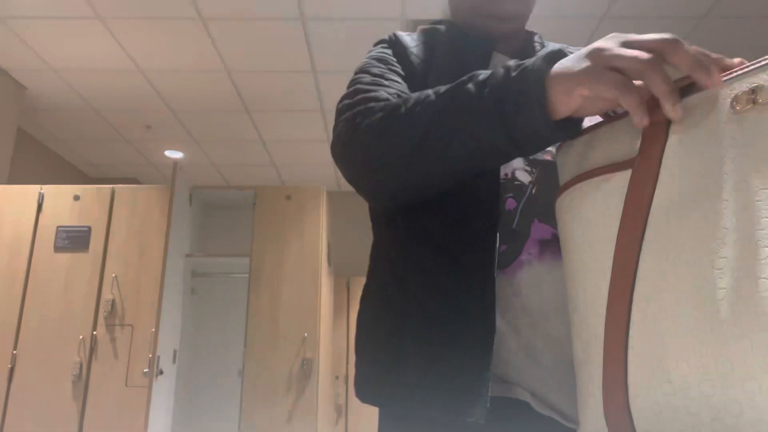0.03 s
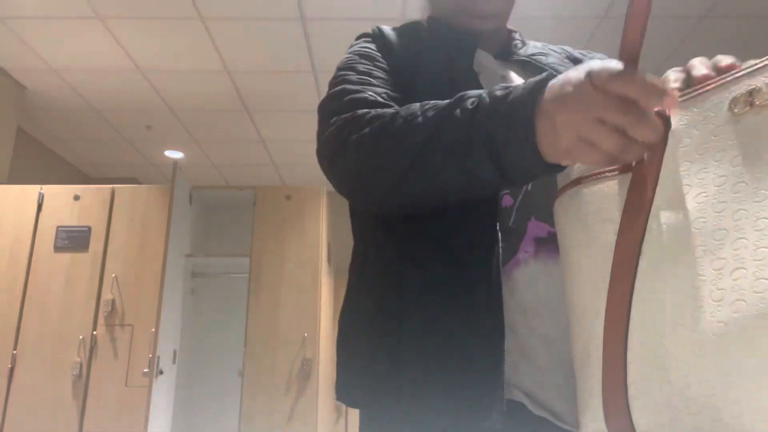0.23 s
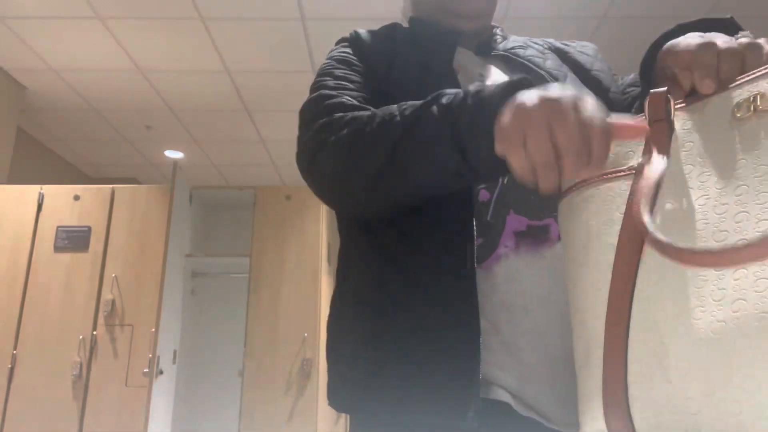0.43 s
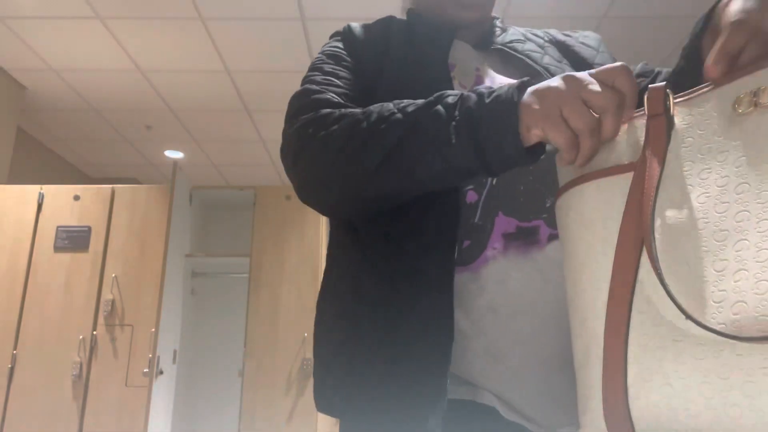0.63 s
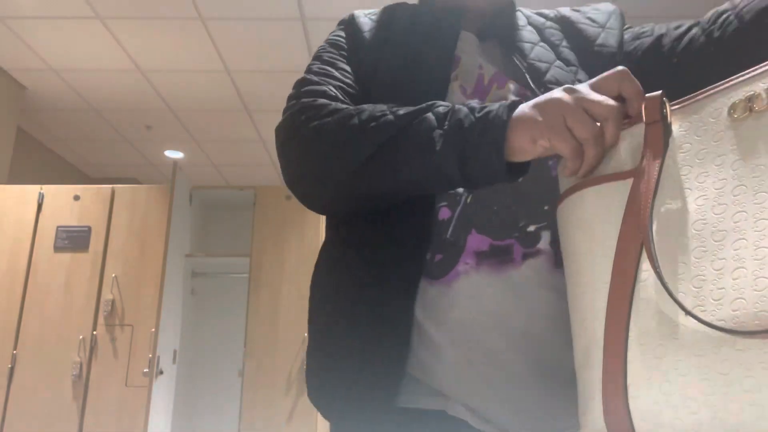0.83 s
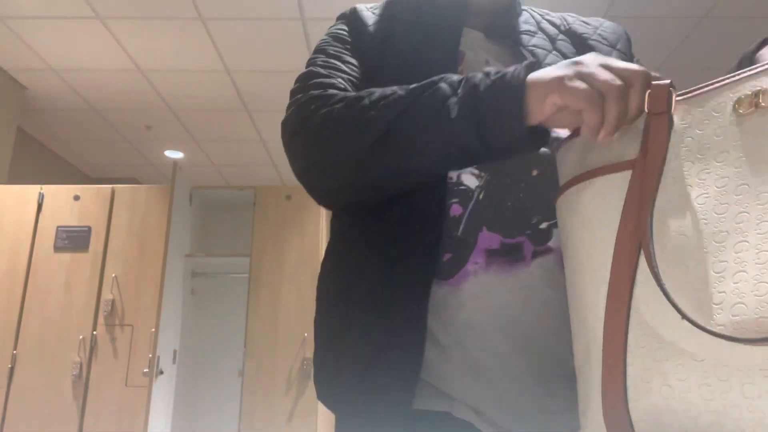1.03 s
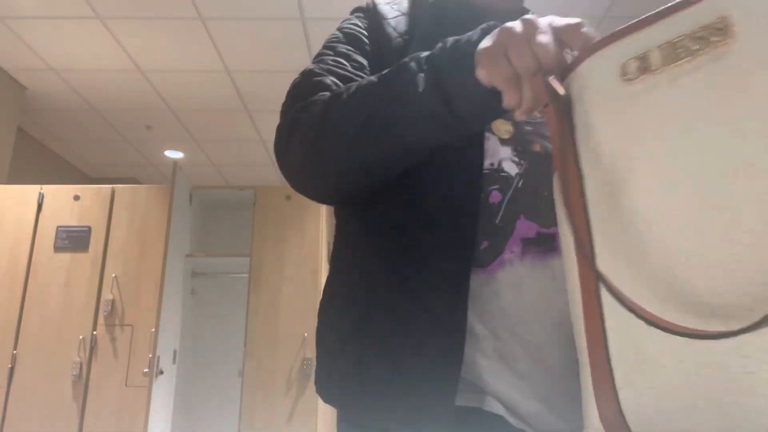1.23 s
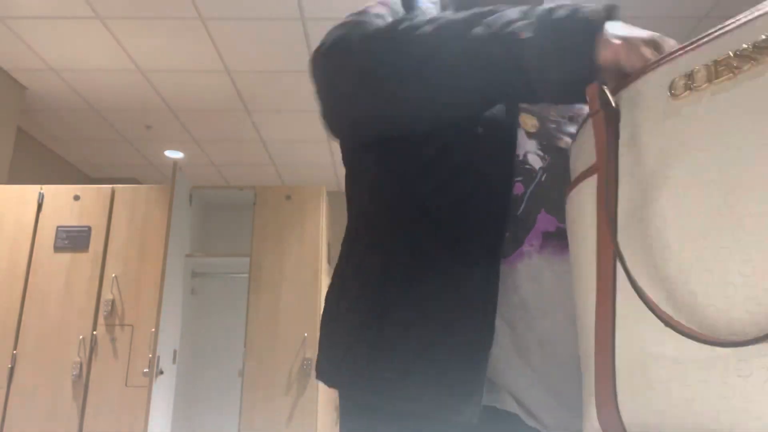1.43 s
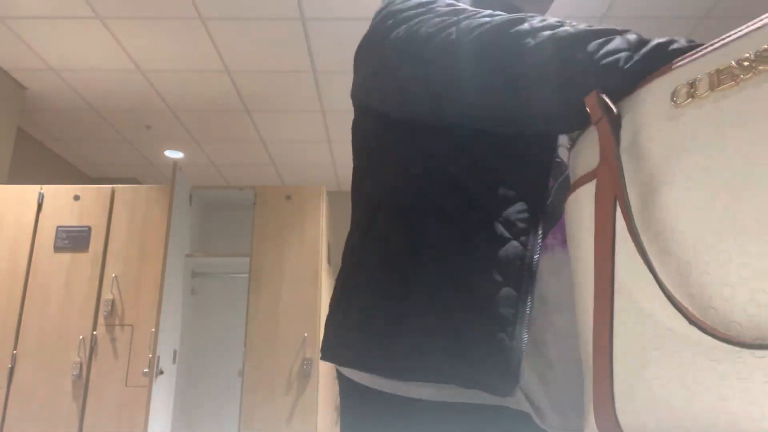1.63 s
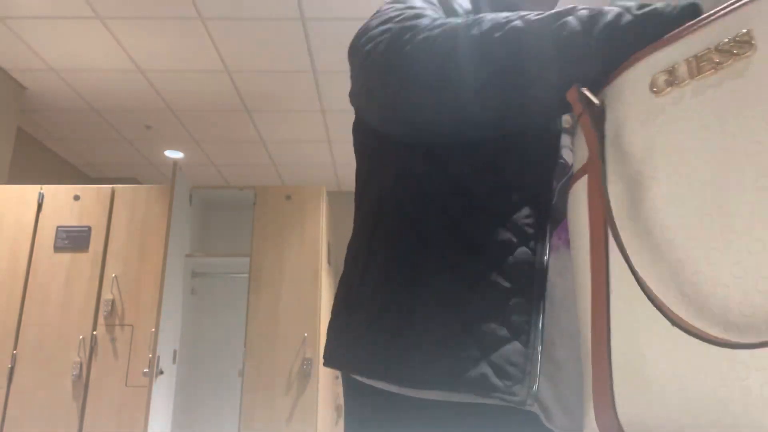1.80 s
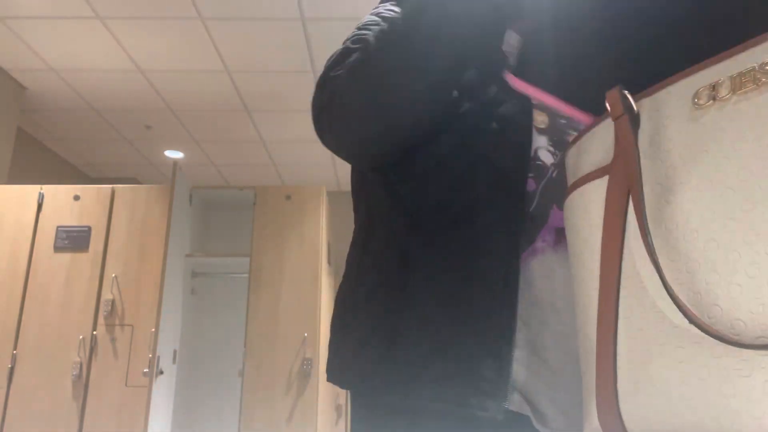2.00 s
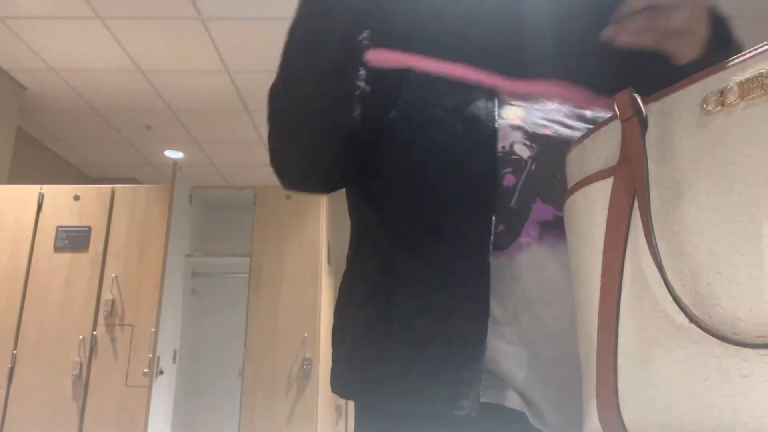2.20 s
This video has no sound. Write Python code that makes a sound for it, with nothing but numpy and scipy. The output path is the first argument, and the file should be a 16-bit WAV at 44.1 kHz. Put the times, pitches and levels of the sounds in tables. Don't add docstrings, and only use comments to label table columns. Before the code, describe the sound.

A zipper rips open in one brief rasping stroke on a stiff handbag, after a few sharp knocks; softer bumps and sleeve rustles follow, in a small humming room, heard close in stereo.

```python
import sys
import numpy as np
from scipy import signal
from scipy.fft import rfft, irfft, next_fast_len
from scipy.io import wavfile

SR = 44100
rng = np.random.default_rng(int(sys.argv[2]) if len(sys.argv) > 2 else 0)


def master(y):
    cut = np.clip(np.atleast_2d(y).T, -1, 1)
    pcm = np.round(cut * 32767)
    wavfile.write(sys.argv[1], SR, pcm.astype(np.int16))


def convert_level_to_amplitude(level_db):
    exponent = np.asarray(level_db, float) / 20
    return 10 ** exponent


N = 99401


def rms_one(x):
    return x / np.sqrt(np.mean(x ** 2) + 1e-20)


def at_hz(points, hz):
    table_hz, value = np.transpose(points)
    return np.interp(np.log(hz + 1), np.log(table_hz), value)


def colour(x, spectrum):
    gain = convert_level_to_amplitude(at_hz(spectrum, np.fft.rfftfreq(N, 1 / SR)))
    return rms_one(irfft(rfft(x) * gain, N))


def drift(rate_hz):
    r = np.exp(-2 * np.pi * rate_hz / SR)
    slow = signal.lfilter([1], [1, -2 * r, r * r], rng.standard_normal(N + SR))
    return rms_one(slow[SR:])


def ring(x, hz, t60):
    r = convert_level_to_amplitude(-60 / (t60 * SR))
    w = 2 * np.pi * hz / SR
    return signal.lfilter([0, np.sin(w)], [1, -2 * r * np.cos(w), r * r], x + 1e-18)


def peak(x, hz, width_hz):
    r = np.exp(-np.pi * width_hz / SR)
    poles = [1, -2 * r * np.cos(2 * np.pi * hz / SR), r * r]
    return signal.lfilter([(1 - r * r) / 2, 0, (r * r - 1) / 2], poles, x)


def smooth_bump(t, centre, length):
    return np.exp(-0.5 * ((t - centre) / length) ** 2)


# (time [s], teeth passed per second [Hz])
SLIDER_SPEED = [
    (.6, 300),
    (.688, 500),
    (.738, 945),
    (.773, 925),
    (.785, 1140),
    (.8, 1045),
    (.822, 1020),
    (.838, 750),
    (.9, 690),
]
# (frequency [Hz], width [Hz], level [dB])
SLIDER_RINGS = [(920, 1400, -4), (1580, 89, 0), (2060, 310, 2.5), (2970, 250, -4), (4000, 130, -12),
                (4740, 530, -4)]


def tooth_clicks():
    rate = np.interp(np.arange(N) / SR, *np.transpose(SLIDER_SPEED))
    turns = np.cumsum(rate * (1 + 0.018 * drift(120))) / SR
    shaken = np.floor(turns + 0.09 * drift(630))
    passing = np.diff(shaken, prepend=0) > 0
    teeth = passing * convert_level_to_amplitude(2 * rng.standard_normal(N))
    softened = signal.sosfilt(signal.butter(4, 3850, fs=SR, output="sos"), teeth)
    clicks = np.zeros(N)
    for k, (hz, width_hz, db) in enumerate(SLIDER_RINGS):
        clicks += (-1) ** k * convert_level_to_amplitude(db) * peak(softened, hz, width_hz)
    return rate, turns, rms_one(clicks)


SINGING_RUNS = {1: [(.646, .014, -33), (.677, .014, -35), (.712, .014, -38), (.754, .018, -26),
                (.797, .006, -34), (.828, .008, -26), (.843, .006, -28), (.885, .01, -41)],
                2: [(.662, .014, -39), (.693, .008, -39), (.768, .018, -37), (.788, .007, -35),
                (.812, .014, -35), (.843, .008, -31), (.865, .01, -39)], 3: [(.632, .012, -39),
                (.665, .006, -39), (.75, .01, -43), (.815, .012, -44), (.84, .012, -41)],
                4: [(.645, .012, -39), (.73, .012, -43), (.762, .014, -42), (.812, .016, -32)]}


def tooth_tone(turns):
    t, tone = np.arange(N) / SR, np.zeros(N)
    for partial, runs in SINGING_RUNS.items():
        level = sum(convert_level_to_amplitude(db) * np.exp(-0.5 * ((t - at) / length) ** 4) for at, length, db in runs)
        tone += level * convert_level_to_amplitude(2 * drift(96)) * np.sin(2 * np.pi * partial * turns)
    return tone


# (frequency [Hz], level per Hz [dB])
TAPE_COLOUR = [(300, -12.5), (1000, -1), (2200, -4), (4300, -10), (7000, -12.5), (11000, -23), (15000, -19)]


def tape_rasp(rate, turns):
    gate = 1 + 0.55 * np.sin(2 * np.pi * turns)
    rasp = np.array([convert_level_to_amplitude(-2) * colour(gate * rng.standard_normal(N), TAPE_COLOUR) for _ in range(2)])
    hiss = signal.sosfilt(signal.butter(2, 1440, "high", fs=SR, output="sos"), rasp)
    brighter_db = 5.5 * np.log2(rate / rate.max())
    return rasp + hiss * (convert_level_to_amplitude(brighter_db) - 1)


# (time [s], level [dB])
PULL_EFFORT = [
    (0.598, -41.5),
    (.64, -37.5),
    (.69, -37),
    (.74, -33),
    (.775, -33.5),
    (.79, -34),
    (.82, -31),
    (.845, -31),
    (.896, -40.5),
]


def zipper():
    rate, turns, clicks = tooth_clicks()
    tone = tooth_tone(turns)
    near, other = tape_rasp(rate, turns)
    s, db = np.transpose(PULL_EFFORT)
    times = np.r_[s[0] - 0.004, s, s[-1] + 0.03]
    level = convert_level_to_amplitude(np.interp(np.arange(N) / SR, times, np.r_[-90, db, -65], right=-140))
    return level * convert_level_to_amplitude(-2) * clicks + tone, level * near, level * other


def knock_body(click, hz):
    if hz > 900:
        body = peak(ring(click, hz, 10.4 / hz), hz, 0.67 * hz)
    else:
        body = ring(click, hz, 7.17 / hz)
    if hz < 450:
        body = body + convert_level_to_amplitude(-17) * ring(click, 123.7, 0.083)
    return body


def knock_slap(click):
    rings = ring(click, 2757, 0.0086) + ring(click, 2150, 0.0091) + 0.5 * ring(click, 3920, 0.0022)
    return convert_level_to_amplitude(8) * click + rings


# (time [s], level [dB], brightness [dB], body pitch [Hz], crease tail [dB])
BAG_KNOCKS = [(0.0498, -31, -16, 1420, -13.5), (0.067, -30.5, -20, 1200, 2),
              (0.0796, -11.5, -2.5, 1620, -9), (0.0783, -14.5, -18, 328, -17.5),
              (.0875, -14.5, -27, 297, -20.5), (0.244, -39, 5.5, 1290, -13), (0.2511, -36.5, 9, 1210, -1),
              (0.3242, -2.5, -9, 727, -26), (0.3239, -15, -41, 306, -15), (0.405, -32, -7, 1290, -7.5),
              (0.4104, -31, 6.5, 1470, -7.5), (0.507, -25.5, -24, 1390, -21), (.533, -25.5, 6, 510, -10),
              (.5365, -26, -24, 305, -26), (.586, -32, -18, 1300, -11), (1.0473, -21, -27, 1000, -13.5),
              (1.047, -26.5, -14, 140, -31), (1.096, -42, -8, 1170, -12), (1.184, -27.5, -9, 506, -22),
              (1.189, -27.5, -19, 258, -31), (1.203, -20.5, -24, 382, -17), (1.2142, -19, -30, 231, -29),
              (1.219, -33, -20, 1450, -16), (1.2137, -18.5, -2, 800, -29), (1.2131, -19, -29, 387, -21),
              (1.634, -28, -12.5, 900, -26), (1.632, -21.5, -37, 290, -23.5), (1.825, -31, -8, 1050, -16),
              (1.851, -31.5, -19, 610, -14.5), (1.915, -20, -24, 865, -26), (1.913, -19.5, -20, 300, -19),
              (1.96, -39, 2, 516, -17), (2.013, -44.5, 10.5, 1450, -21), (2.058, -29, -14, 462, -16),
              (2.1688, -15, -36, 1220, -34.5), (2.172, -21, -23, 1400, -32)]
# (frequency [Hz], level per Hz [dB])
CREASE_COLOUR = [(100, -13), (300, 6.5), (650, -2.5), (1500, -1), (2500, -7), (5000, -25.5), (11000, -38.5),
                 (15000, -39)]
# (frequency [Hz], level per Hz [dB])
CRACK_COLOUR = [(300, -23), (1500, 1.5), (2800, -25), (4500, -2.5), (8000, -20), (11000, -20), (15000, -12)]


def knocks():
    crack_t60_s, tail_t60_s = 0.0038, 0.15
    hits, tail, crack = np.zeros((3, N + SR))
    t = np.arange(SR // 2) / SR
    click = signal.sosfilt(signal.butter(2, 4170, fs=SR, output="sos"), 1.0 * (t == 0))
    slap = knock_slap(click)
    for s, db, bright_db, hz, tail_db in BAG_KNOCKS:
        span = slice(int(s * SR), int(s * SR) + len(t))
        hits[span] += convert_level_to_amplitude(db) * (knock_body(click, hz) + convert_level_to_amplitude(bright_db) * slap)
        crack[span] += convert_level_to_amplitude(db + bright_db - 15 - 60 * t / crack_t60_s)
        tail[span] += convert_level_to_amplitude(db + tail_db - 60 * t / tail_t60_s) * np.minimum(t / 0.0012, 1)
    noises = []
    for _ in range(2):
        crease = colour(rng.standard_normal(N) * convert_level_to_amplitude(1.5 * drift(190)), CREASE_COLOUR)
        snap = colour(rng.standard_normal(N), CRACK_COLOUR)
        noises.append(tail[:N] * crease + crack[:N] * snap)
    return hits[:N], noises[0], noises[1]


# (time [s], level [dB])
TAB_TICKS = [
    (.4095, -42),
    (0.412, -35),
    (.424, -55),
]
# (frequency [Hz], level [dB], time to fall 60 dB [s])
TAB_RINGS = [(7300, 8.5, 0.005), (12100, 0.5, .05), (14300, -11, .015), (15500, -8, 0.014)]


def tab():
    s, db = np.transpose(TAB_TICKS)
    luck_db = rng.normal(0, 2.5, (len(s), len(TAB_RINGS)))
    out = np.zeros(N)
    for k, (hz, ring_db, t60) in enumerate(TAB_RINGS):
        clicks = np.zeros(N)
        clicks[(s * SR).astype(int)] = convert_level_to_amplitude(db + ring_db + luck_db[:, k])
        out += ring(clicks, hz, t60)
    return out


# (time [s], level [dB])
CLOTH_HANDLING = [(0, -64), (.22, -58.5), (.3, -78), (0.464, -50), (.51, -64), (.95, -61.5), (1.05, -55.5),
                  (1.12, -62), (1.212, -47), (1.301, -60), (1.47, -57), (1.6, -56.5), (1.72, -64.5),
                  (1.8, -61.5), (1.86, -52.5), (2.0, -58.5), (2.13, -64), (2.2, -52.5)]
# (frequency [Hz], level per Hz [dB])
CLOTH_COLOUR = [(150, -33), (400, -21), (700, -2), (1500, 2.5), (1800, -4), (5000, -17), (11000, -26.5),
                (15000, -23)]


def cloth():
    handling_db = np.interp(np.arange(N) / SR, *np.transpose(CLOTH_HANDLING))
    level = convert_level_to_amplitude(8 + handling_db + 1.53 * drift(32))
    chance = 2500 * convert_level_to_amplitude(3 * drift(20)) / SR
    born = rng.random((2, N)) < chance
    size_db = 3.2 * np.minimum(rng.exponential(1, (2, N)), 4)
    grains = born * convert_level_to_amplitude(size_db) * rng.choice([-1, 1], (2, N))
    return [level * colour(convert_level_to_amplitude(-2) * rms_one(g) + rng.standard_normal(N), CLOTH_COLOUR) for g in grains]


BRUSH_TIMES = [.251, .466, 1.204, 1.341, 1.941, 1.996, 2.016, 2.201, 2.19, 2.013, 2.2, 2.068, .42, .61]
# (length [s], level [dB], centre [Hz], width [Hz])
SLEEVE_BRUSHES = [(0.0094, -66, 2800, 1800), (0.012, -47, 2300, 900), (0.016, -36, 370, 770),
                  (0.015, -52, 4100, 6500), (0.082, -53, 1500, 6400), (0.011, -52, 14800, 1600),
                  (0.0059, -50, 2700, 2600), (0.026, -47, 2200, 1600), (0.008, -51, 3000, 900),
                  (0.0061, -58, 7200, 900), (0.025, -59, 7400, 3000), (0.0071, -58, 7700, 8000),
                  (0.0063, -52, 1500, 540), (0.011, -46.5, 1440, 350)]


def brushes():
    t, out = np.arange(N) / SR, np.zeros((2, N))
    for side in out:
        for s, (length, db, hz, width_hz) in zip(BRUSH_TIMES, SLEEVE_BRUSHES):
            hiss = peak(peak(rng.standard_normal(N), hz, width_hz), hz, width_hz)
            side += convert_level_to_amplitude(db) * smooth_bump(t, s, length) * rms_one(hiss)
    return out


# (frequency [Hz], level per Hz [dB])
AIR_COLOUR = [(45, -3), (70, 7.5), (165, 2), (500, -13.5), (1500, -25.5), (1800, -20), (11000, -44),
              (15000, -41.5)]


def air():
    sides = []
    for _ in range(2):
        rumble = convert_level_to_amplitude(-41.5) * colour(rng.standard_normal(N), AIR_COLOUR)
        hum = convert_level_to_amplitude(-44) * rms_one(peak(rng.standard_normal(N), 166.8, 16))
        sides.append(rumble + hum)
    return sides


def room(x):
    t60_s, wall_cut_hz = 0.31, 5700
    size = next_fast_len(N + SR)
    hz = np.fft.rfftfreq(size, 1 / SR)
    out = np.zeros((2, len(hz)), complex)
    for k, lag in enumerate(rng.uniform(0.011, 0.03, 16)):
        loss = convert_level_to_amplitude(-60 * lag / t60_s) / (1 + 1j * hz / wall_cut_hz)
        loop = loss * np.exp(-2j * np.pi * hz * lag)
        out[k % 2] += (-1) ** (k // 2) * loop / (1 - loop)
    return convert_level_to_amplitude(-20.5) * irfft(out * rfft(x, size), size)[:, :N]


# (frequency [Hz], likeness [0-1])
PORT_LIKENESS = [(60, 1), (300, 0.45), (1000, 0.66), (3000, 0.7), (6000, 0), (10000, 0.43), (13000, 0.9)]


def spread(near, other):
    alike = np.clip(at_hz(PORT_LIKENESS, np.fft.rfftfreq(N, 1 / SR)), 0, 1)
    shared = rfft(near) * np.sqrt(1 + alike)
    differing = rfft(other) * np.sqrt(1 - alike)
    return irfft(np.array([shared + differing, shared - differing]), N) / np.sqrt(2)


def scene():
    zip_direct, zip_near, zip_other = zipper()
    knock_direct, knock_near, knock_other = knocks()
    direct = zip_direct + knock_direct + tab()
    wet = room(direct + zip_near + knock_near)
    noises = np.array([zip_near + knock_near, zip_other + knock_other])
    near, other = noises + np.array(cloth()) + np.array(brushes()) + np.array(air()) + wet
    return direct + spread(near, other)


def roll_off(x):
    return signal.sosfilt(signal.butter(12, 16620, fs=SR, output="sos"), x)


# (frequency [Hz], level [dB])
MIC_COLOUR = [(100, 0.5), (400, 1), (630, 1.5), (1000, 2), (1300, 0.5), (1560, 3.5), (1750, -4.5),
              (4000, -1)]
# (frequency [Hz], phase [radians])
PORT_TURN = [(0, -1), (260, 1), (600, -2), (1600, -2.5), (2700, -3.5), (4300, -8), (9000, -11), (15700, -6)]
# (frequency [Hz], left minus right [dB])
PORT_BALANCE = [(60, -2.5), (300, 6), (900, -1), (1500, -2.2), (2500, 7), (5000, 0.2), (14000, 1)]


def record(dry):
    late_bass_hz, late_mid_hz, low_cut_hz, high_cut_hz = 326, 900, 28.7, 15780
    size = next_fast_len(N + SR // 4)
    hz = np.fft.rfftfreq(size, 1 / SR)
    late = ((1 - 1j * hz / late_bass_hz) / (1 + 1j * hz / late_bass_hz)) ** 7
    late = late * (1 - 1j * hz / late_mid_hz) / (1 + 1j * hz / late_mid_hz)
    low_cut = 1 / (1 - 1j * low_cut_hz / (hz + 1)) ** 7
    high_cut = 1 / np.sqrt(1 + (hz / high_cut_hz) ** 400.0)
    microphone = late * convert_level_to_amplitude(at_hz(MIC_COLOUR, hz)) * low_cut * high_cut
    half_turn = np.exp(0.5j * np.interp(hz, *np.transpose(PORT_TURN)))
    half = half_turn * convert_level_to_amplitude(at_hz(PORT_BALANCE, hz) / 2)
    ports = microphone * np.array([half, 1 / half])
    mix = irfft(rfft(dry, size) * ports, size)[:, :N]
    return roll_off(mix)


dry = scene()
out = record(dry)
master(out)
```